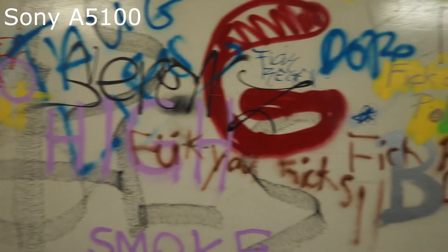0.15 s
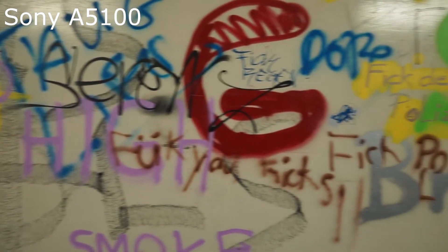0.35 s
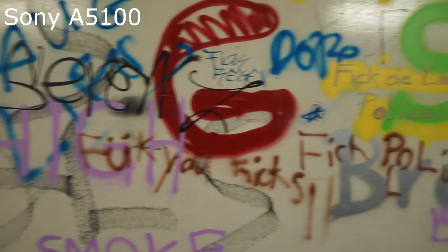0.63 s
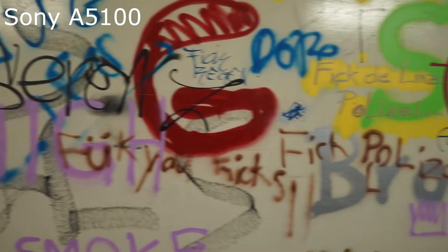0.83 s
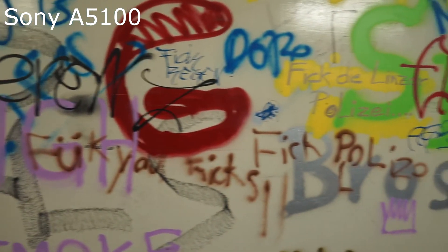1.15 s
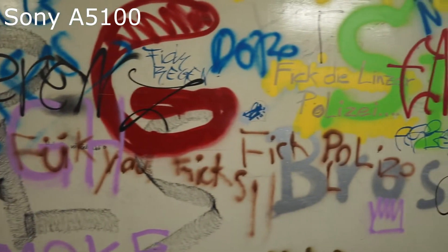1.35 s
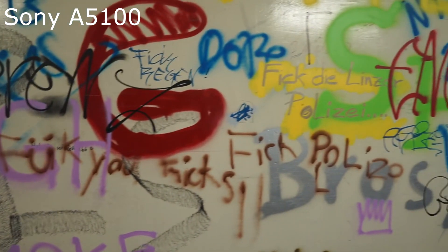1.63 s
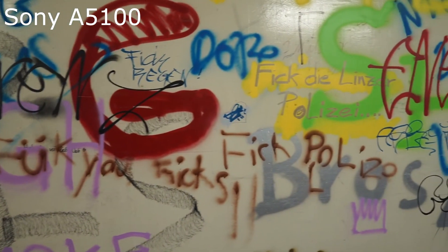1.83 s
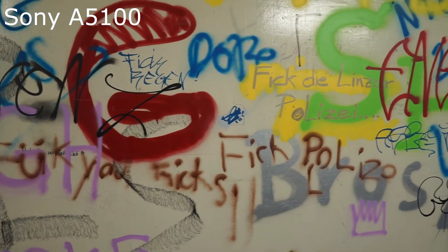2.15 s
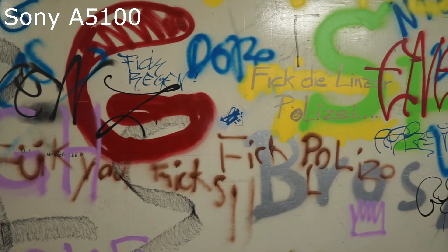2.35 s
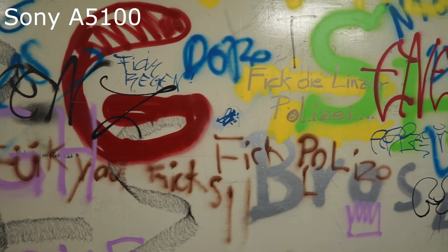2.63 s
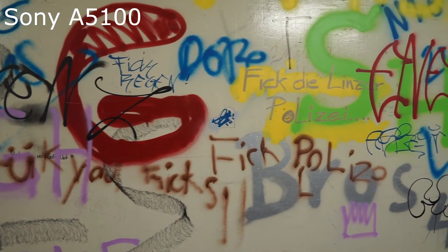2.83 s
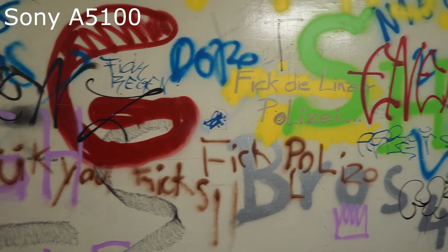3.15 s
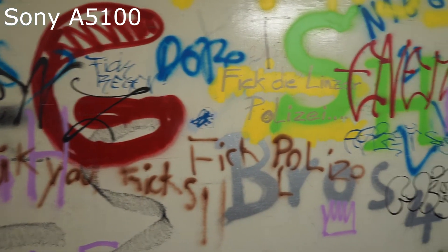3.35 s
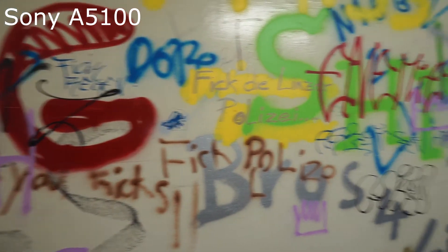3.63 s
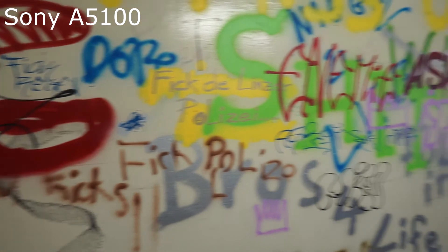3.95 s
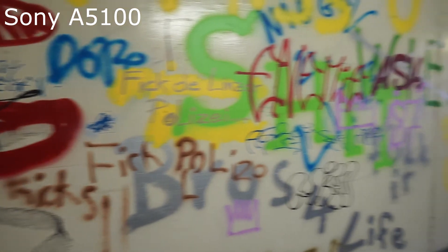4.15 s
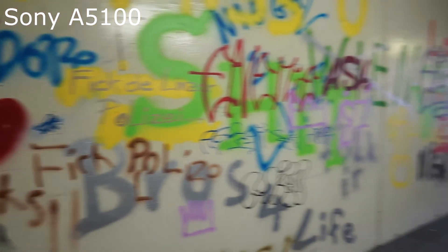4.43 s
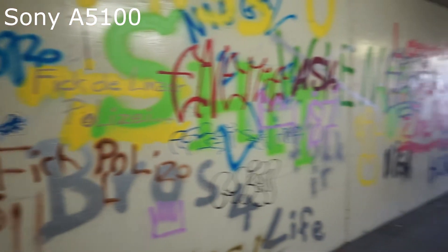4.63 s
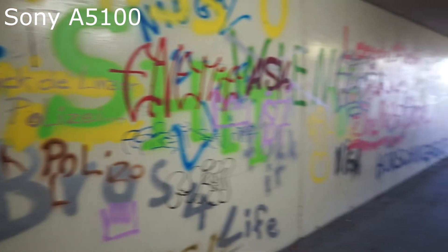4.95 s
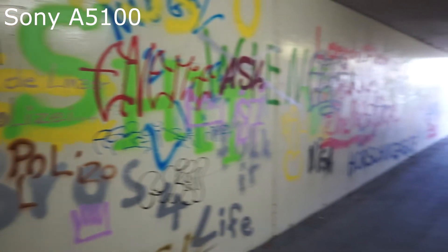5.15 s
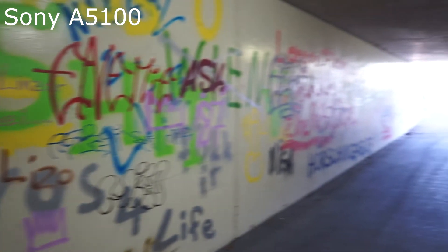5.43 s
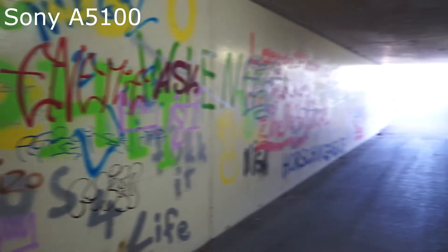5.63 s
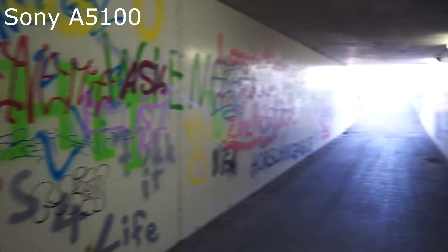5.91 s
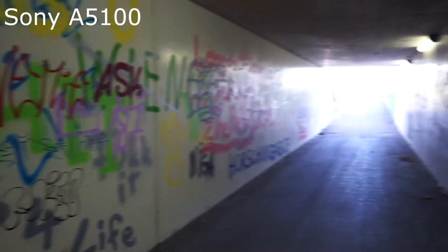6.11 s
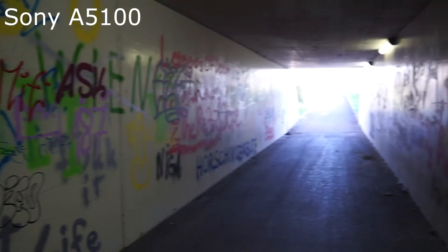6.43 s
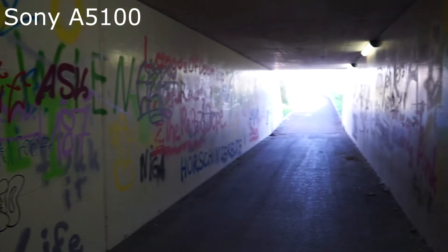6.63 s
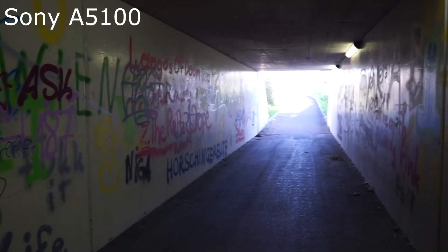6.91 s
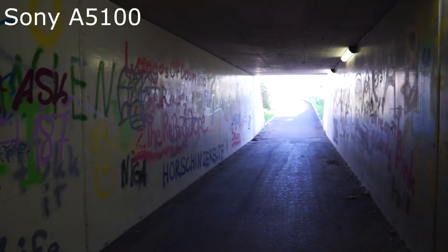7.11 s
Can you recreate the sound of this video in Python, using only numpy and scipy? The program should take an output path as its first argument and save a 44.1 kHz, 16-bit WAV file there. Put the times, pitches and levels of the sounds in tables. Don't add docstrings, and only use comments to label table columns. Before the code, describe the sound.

Low traffic rumble and engine hum in a concrete underpass, wind thumping the microphone, lens motor ticking, road roar growing brighter toward the end.

```python
import sys
import numpy as np
from scipy import signal
from scipy.io import wavfile
from scipy.ndimage import uniform_filter1d, map_coordinates

SR = 44100
rng = np.random.default_rng(int(sys.argv[2]) if len(sys.argv) > 2 else 0)


def boost_factor(decibels):
    exponent = np.asarray(decibels, float) / 20
    return 10 ** exponent


def put_to_file(sound):
    columns = np.atleast_2d(sound).T
    safe = np.clip(columns, -1, 1)
    whole_steps = np.round(safe * 32767)
    wavfile.write(sys.argv[1], SR, whole_steps.astype(np.int16))


N = 321029


def evened(x):
    return x / np.sqrt(np.mean(x ** 2) + 1e-20)


def read(points, hz):
    f, value = np.transpose(points)
    return np.interp(np.log(hz + 1), np.log(f + 1), value)


def curve(rows, column=1):
    rows = np.array(rows, float)
    return np.interp(np.arange(N) / SR, rows[:, 0], rows[:, column])


def swells(rows, rise_db_per_s, fall_db_per_s, column=1):
    t = np.arange(0, N + 64, 64)[:, None] / SR
    start, db, hold = np.array(rows, float).T[[0, column, 2]]
    rise = rise_db_per_s * np.maximum(start - t, 0)
    fall = fall_db_per_s * np.maximum(t - start - abs(hold), 0)
    gain = np.sqrt((boost_factor(db - rise - fall) ** 2).sum(1))
    return np.interp(np.arange(N) / SR, t[:, 0], gain)


def drift(rate_hz):
    knots = rng.standard_normal(200)
    return evened(map_coordinates(knots, [np.arange(N) / SR * np.clip(rate_hz, .1, 25)], order=3))


def ring(x, hz, width):
    r = np.exp(-np.pi * width / SR)
    return 2 * signal.lfilter([1 - r], [1, -r * np.exp(2j * np.pi * hz / SR)], x).real


# (f/Hz, left minus right level/dB)
PORT_LEAN = [(60, 1.5), (220, -1.5), (800, -2.5), (2900, -0.5), (10600, 0)]


def noise(colour, same, lead, patchy_db, size=1024):
    hz = np.fft.rfftfreq(size, 1 / SR)
    frames = 4 * N // size + 5
    a, b, c, d, patches = rng.standard_normal((frames, len(hz), 5)).T
    patches = uniform_filter1d(patches, size=10, axis=0)
    patches = evened(uniform_filter1d(patches, size=12, axis=1))
    like = np.clip(same(hz), -1, 1)[:, None]
    left = a + 1j * b
    shared = like * left * np.exp(-1j * lead(hz))[:, None]
    right = shared + np.sqrt(1 - like ** 2) * (c + 1j * d)
    inside = (hz >= colour[0][0]) & (hz <= colour[-1][0])
    z = np.array([left, right]) * boost_factor(read(colour, hz)[:, None] + patchy_db * patches) * inside[:, None]
    z = z * boost_factor(np.array([.5, -.5])[:, None] * read(PORT_LEAN, hz))[:, :, None]
    return evened(signal.istft(z, nperseg=size, noverlap=size - size // 4)[1][:, :N])


# (multiple of the engine cycle, rms level/dB)
IDLE_HARMONICS = [(6, -52.6), (8, -45.0), (10, -55.8), (12, -45.0), (14, -52.0), (16, -49.2), (21, -57.9),
                  (22, -55.0), (23, -52.0), (24, -57.4), (25, -51.7), (26, -41.8), (27, -52.2), (28, -51.5)]
# (t/s, level/dB)
IDLE_LOUDNESS = [(0, 1), (1, 1.5), (1.6, 0.5), (2.5, 0.5), (3.3, 0.5), (4, 0), (5, -2.5), (6, 0),
                 (7.28, 0.5)]


def idling_engine():
    cycle_hz = 11.571
    angle = 2 * np.pi * cycle_hz * np.arange(N) / SR + 0.089 + 0.023 * drift(rate_hz=1.154)
    ports = np.array([[-.004], [.004]])
    hum = np.zeros((2, N))
    for k, db in IDLE_HARMONICS:
        smear = .8 * (k - 26) + .21 * abs(k - 26) ** 3
        level = boost_factor(db + 1.36 * drift(rate_hz=2.273))
        hum += level * np.cos(k * (angle + ports * k / 26) + smear)
    port_gain = boost_factor(np.array([[-.4], [.4]]))
    return np.sqrt(2) * boost_factor(curve(IDLE_LOUDNESS)) * hum * port_gain


# (t/s, rms level/dB)
THROTTLE = [
    (4.8, -66),
    (5.2, -42.5),
    (5.7, -49),
    (6.0, -44.5),
    (6.3, -38.5),
    (6.6, -33.5),
    (6.75, -40),
    (7.05, -45.5),
    (7.28, -33),
]


def revving_engine():
    start_s, start_hz, climb_hz_per_s = 4.8, 65.8, 17.2
    since = np.arange(N) / SR - start_s
    firing_hz = start_hz + climb_hz_per_s * since + 1.425 * drift(rate_hz=8)
    angle = 2 * np.pi * np.cumsum(firing_hz) / SR
    tone = np.sin(angle) + boost_factor(-9.0) * np.sin(2 * angle)
    return np.sqrt(2) * boost_factor(curve(THROTTLE)) * (since > 0) * tone


# (f/Hz, level/dB per Hz)
RUMBLE_COLOUR = [(12, -42), (25, -23), (45, -5.5), (75, -1.5), (150, -4.5), (230, -5), (320, -6.5),
                 (380, -16), (480, -36), (650, -54)]
ROAR_COLOUR = [(220, -26.5), (310, 1), (370, 0), (530, -3), (900, -3), (1300, -7), (1900, -11.5),
               (2600, -21.5), (3400, -40)]
TYRE_COLOUR = [(1200, -12), (1700, -8.5), (2500, -8.5), (3500, -14), (4600, -20.5), (5500, -23),
               (6350, -23.5), (7300, -27), (9000, -31.5), (11100, -37.5)]
DECK_COLOUR = [(12, -20), (25, -12), (42, 2), (65, -0.5), (90, -11)]
# (f/Hz, 0 to 1)
FAR_LIKENESS = [(60, .985), (130, .997), (260, .996), (380, .975), (550, .91), (1150, .58), (2400, .27),
                (5000, .03), (10600, .18)]
# (f/Hz, phase/rad)
FAR_LEAD = [(100, 0), (250, -.03), (400, -.15), (900, -.3), (1500, -.6), (3000, -.5)]
# (t/s, level/dB over the quietest moment)
ROAD_SWELL = [(0, 2), (.6, 1.5), (1.2, 0), (2.4, 1), (3.1, 2), (3.45, 4.5), (3.65, 2), (4, 3.5), (4.3, 4),
              (4.85, 6), (5.7, 7.5), (6.25, 10), (6.55, 9.5), (6.9, 10), (7.05, 11.5), (7.28, 12)]
# (t/s, level/dB, hold/s)
LORRY_PASSES = [
    (.6, -43, .1),
    (1.4, -52.5, 0.72),
    (2.5, -42, 0.3),
    (5.2, -55, 0),
    (7.28, -48.5, 0),
]
# (t/s, tyre hiss level/dB, hold/s)
CAR_SWISH = [
    (3.36, -59.5, 0.11),
]


def road():
    far = dict(same=lambda hz: read(FAR_LIKENESS, hz), lead=lambda hz: read(FAR_LEAD, hz))
    wall_db, open_db, turn_s, turn_length_s = -45, -38, 3.24, 1
    turned = .5 + .5 * np.tanh((np.arange(N) / SR - turn_s) / turn_length_s)
    rumble_gain = boost_factor(wall_db + (open_db - wall_db) * turned)
    rumble = rumble_gain * noise(RUMBLE_COLOUR, **far, patchy_db=2.5, size=4096)
    lorry_gain = swells(LORRY_PASSES, rise_db_per_s=21, fall_db_per_s=10.5)
    lorries = lorry_gain * noise(DECK_COLOUR, **far, patchy_db=-1.0, size=4096)
    swell_db = curve(ROAD_SWELL)
    roar = boost_factor(-50 + swell_db) * noise(ROAR_COLOUR, **far, patchy_db=1.18)
    steady_hiss = boost_factor(-63 + 1.27 * swell_db)
    swish = swells(CAR_SWISH, rise_db_per_s=40, fall_db_per_s=90)
    hiss = np.hypot(steady_hiss, swish) * noise(TYRE_COLOUR, **far, patchy_db=1.75)
    return rumble + lorries + roar + hiss


# (f/Hz, width/Hz, ramp/dB per s, [(t/s, rms level/dB, hold/s)])
TYRE_SONGS = [
    (6370, 620, 20, [(4.3, -78.5, .4), (5.3, -81, .6), (6.3, -79, 0.24), (6.9, -79, .4)]),
    (10900, 250, 190, [(4.6, -76, 0), (4.8, -82, 0.07), (4.96, -74, .02)]),
]


def tyre_song():
    air = rng.standard_normal((2, N))
    air[1] = .5 * air[0] + .85 * air[1]
    song = np.zeros((2, N))
    for hz, width, ramp, rows in TYRE_SONGS:
        band = evened(ring(ring(air, hz, width), hz, width))
        song += swells(rows, ramp, ramp) * band
    return song


# (t/s, level/dB, hold/s)
DRAUGHT_GUSTS = [(.07, -49, 0.045), (.2, -37.5, 0.021), (.34, -43, 0), (.49, -38, 0.0079), (.65, -40, .02),
                 (.81, -35.5, .03), (1.0, -50, .2), (1.68, -40, 0.027), (1.84, -35.5, 0),
                 (1.91, -34.5, 0.02), (2.06, -43, 0.025), (2.26, -40.5, 0.23), (2.62, -29, 0),
                 (2.81, -40, 0.19), (2.93, -35, 0.29), (3.22, -38, 0.15), (3.37, -41, .16),
                 (3.7, -39.5, 0.041), (3.79, -40, 0.043), (3.96, -38.5, 0.082), (5.19, -56, 0.15),
                 (5.61, -35, 0.054), (5.75, -42, 0), (5.88, -39, 0), (5.98, -45, 0.12), (6.45, -40.5, 0),
                 (7.27, -38, 0.077)]
# (f/Hz, level/dB per Hz)
DRAUGHT_COLOUR = [(12, -33), (40, -17.5), (70, 1), (120, 1.5), (180, -5.5), (250, -13), (350, -47),
                  (500, -27), (700, -73)]
# (t/s, peak level/dB, f/Hz, length/cycles, right port lag/ms)
EDDIES = [(.828, -14, 154, 0.81, 0.86), (1.923, -16, 154, 1.16, 1.05), (2.624, -20, 171, 0.45, 0.8),
          (2.656, -20.5, 121, 0.57, 1), (3.094, -19, 147, 1.5, 0.86), (3.21, -24, 138, 1.1, 0.77),
          (3.697, -20.5, 107, 0.6, 0.75), (0.061, -29, 142, 0.93, 0.57), (0.199, -26, 149, 0.92, 0.83),
          (0.499, -29, 69.6, 1.8, 0.88), (1.676, -25.5, 91, 1.4, .8), (2.979, -20.5, 114, 0.77, .8),
          (3.16, -23.5, 98, 0.7, 1.3), (3.238, -31, 80, 1.5, .8), (3.369, -26, 103, 1.7, 0.73),
          (3.48, -24, 89, 1.8, 0.97), (3.534, -24, 100, 0.79, 1.1), (3.951, -31, 109, 3.9, 1.3),
          (5.625, -42, 114, 1.3, 0.91)]


def draught():
    flow = noise(DRAUGHT_COLOUR, lambda hz: .97 - hz / 450, lambda hz: 2 * np.pi * hz * 0.001,
                 patchy_db=-1.0, size=2048)
    gusts = swells(DRAUGHT_GUSTS, rise_db_per_s=214, fall_db_per_s=192)
    out = gusts * boost_factor(3.0 + 0.64 * drift(rate_hz=20)) * flow
    for s, db, hz, cycles, lag_ms in EDDIES:
        turns = (np.arange(-2000, 2000) / SR - np.array([[0], [lag_ms / 1000]])) * hz
        eddy = np.exp(-(turns / cycles) ** 2) * np.cos(2 * np.pi * (turns - .1 - 0.06 * turns ** 2))
        core_size = 0.21 / cycles * hz / 160
        core = core_size * np.exp(-(turns / 0.51) ** 2) * np.cos(2 * np.pi * 2.38 * turns)
        at = round(s * SR) - 2000
        out[:, at:at + turns.shape[1]] -= boost_factor(db) * (eddy + core)
    return out


def focus_steps(accents_db, clump_db):
    steps = np.arange(0, N - 400, SR / 200).astype(int)
    accent_db = np.resize(accents_db, len(steps)) + clump_db * drift(rate_hz=18)[steps]
    draw = rng.standard_normal((len(steps), 3)).clip(-2, 1.6)
    size = boost_factor(accent_db + 1.6 * draw[:, 0])
    knocks = np.zeros(N)
    knocks[steps] = size * np.sign(draw[:, 1])
    rebounds = steps + 60 + (25 * draw[:, 2]).astype(int)
    knocks[rebounds] = .6 * size * draw[:, 1]
    knocks = evened(knocks) + 0.25 * rng.standard_normal((2, N))
    return np.array([knocks[0], np.roll(knocks[1], -5)])


# (panel 1 front or 2 side, f/Hz, width/Hz, level/dB)
SHELL_MODES = [
    (1, 1445, 125, -1),
    (1, 3290, 120, -17),
    (2, 1780, 180, 2),
    (2, 3330, 200, -17),
]
# (t/s, front panel level/dB, hold/s, side panel level/dB)
FOCUS_RUNS = [(0, -50, 0.073, -55.5), (.15, -54, .25, -68), (.57, -52, 0.49, -53.5), (1.1, -55, 0.04, -57),
              (1.28, -50.5, 0.07, -66), (1.43, -51, .16, -55.5), (1.62, -53, 0.067, -68),
              (1.85, -48.5, .03, -68), (1.95, -49.5, 0.08, -69), (2.14, -53, .05, -56),
              (2.26, -51, .1, -64), (2.45, -55, .08, -62), (2.6, -51, .08, -66), (2.76, -51, .09, -68),
              (3.1, -50, .1, -59), (3.28, -48, 0.095, -64), (3.5, -53, .22, -61), (3.82, -54, .22, -57),
              (4.33, -50.5, .2, -60), (4.72, -52, 0.12, -70), (5.4, -54, .12, -71), (5.97, -48, .1, -57),
              (6.15, -52, .06, -65), (6.46, -47, 0, -59), (6.7, -56, .15, -60)]


def focus_drive():
    knocks = {1: focus_steps([-7, -8, -3, 0], clump_db=3),
              2: focus_steps([-12, -13, -6, 0], clump_db=1.5)}
    runs = {1: swells(FOCUS_RUNS, 90, 90),
            2: swells(FOCUS_RUNS, 90, 90, column=3)}
    out = np.zeros((2, N))
    for panel, hz, width, db in SHELL_MODES:
        panel = int(panel)
        rung = ring(ring(knocks[panel], hz, width), hz, 3 * width)
        out += runs[panel] * boost_factor(db + 18.0) * rung
    return out


def ticking(rate_hz, spread_db, burst_s, accents_db):
    turns = np.arange(N) / SR * rate_hz
    sizes = boost_factor(spread_db * rng.standard_normal(2000) + np.resize(accents_db, 2000))
    decay = np.exp(-(turns % 1) / rate_hz / burst_s)
    return sizes[turns.astype(int)] * decay * rng.standard_normal((2, N))


# (t/s, level/dB, hold/s)
APERTURE_RUNS = [(.83, -88, .3), (1.5, -83, 0.24), (2.83, -76.5, 0.11), (3.3, -80, .38), (4.33, -80, 0),
                 (4.6, -86, .8), (6, -80, 0), (6.83, -85, 0.11), (7.17, -87, 0.072)]


def aperture_drive():
    chirps = ticking(rate_hz=47.4, spread_db=1.5, burst_s=.006, accents_db=[-4, -1, 0])
    chirps = ring(ring(chirps, 9740, 520), 9740, 520)
    chirps[1] = .9 * chirps[0] + .3 * chirps[1]
    gain = boost_factor(-94) + swells(APERTURE_RUNS, rise_db_per_s=50, fall_db_per_s=50)
    return gain * evened(chirps)


# (f/Hz, level/dB, t60/s)
CLICK_MODES = [(1410, -6, 0.031), (1720, 4, 0.015), (3270, -17, 0.03), (3680, -15, .025), (430, -13, 0.046),
               (2550, -14, .012), (4350, -17, .014), (8100, -37, .008)]


def shell_click():
    start_s, peak_db = 3.8733, -19
    out, t = np.zeros((2, N)), np.arange(3000) / SR
    ports = t + np.array([[0], [.0001]])
    click = np.zeros((2, len(t)))
    for k, (hz, db, t60) in enumerate(CLICK_MODES):
        click += (-1) ** k * boost_factor(db - 60 * t / t60) * np.sin(2 * np.pi * hz * ports)
    click *= (1 - np.exp(-t / 0.00075)) ** 2
    edge_gain = boost_factor(-27 - 60 * t / 0.015) * (1 - np.exp(-t / .0003))
    click += edge_gain * rng.standard_normal((2, len(t)))
    out[:, round(start_s * SR):][:, :len(t)] += boost_factor(peak_db) * click
    return out


def shell_snap():
    start_s, peak_db, t60_s = 6.9255, -18, .016
    out, t = np.zeros((2, N)), np.arange(3000) / SR
    taps = 0.5 * rng.standard_normal((2, len(t))) * (rng.random((2, len(t))) < .3)
    taps[1] = .6 * taps[1] + .5 * np.roll(taps[0], -1)
    taps[0, [12, 32]] = 1.5, 1.7
    taps[1, [4, 12, 25]] = .9, -1.2, .8
    spike = np.exp(-abs(t[:25] - t[12]) / .00008) - .4 * np.hanning(25)
    crack = signal.lfilter(spike, 1, taps * boost_factor(-60 * t / t60_s))
    out[:, round(start_s * SR) - 12:][:, :len(t)] += boost_factor(peak_db) * crack
    return out


def scene():
    distant = idling_engine() + revving_engine() + road() + tyre_song()
    at_camera = draught() + focus_drive() + aperture_drive() + shell_click() + shell_snap()
    return distant + at_camera


def top_cut(x):
    return signal.sosfilt(signal.butter(12, 11050, fs=SR, output="sos"), x)


# (f/Hz, level/dB per Hz)
MIC_HISS = [(1500, -31), (2500, -10), (4000, -3), (6000, -1), (8000, -2), (10000, -1.5), (11100, -2)]


def record(dry):
    hiss = noise(MIC_HISS, lambda hz: .1 + 0 * hz, lambda hz: 0 * hz, patchy_db=1.0)
    low_pass = signal.firwin(511, 11020, window=("kaiser", 9), fs=SR)
    padded = np.pad(dry + boost_factor(-71) * hiss, ((0, 0), (255, 255)), "reflect")
    mix = signal.oaconvolve(padded, low_pass[None], "valid", axes=1)
    return top_cut(mix)


dry = scene()
out = record(dry)
put_to_file(out)
```